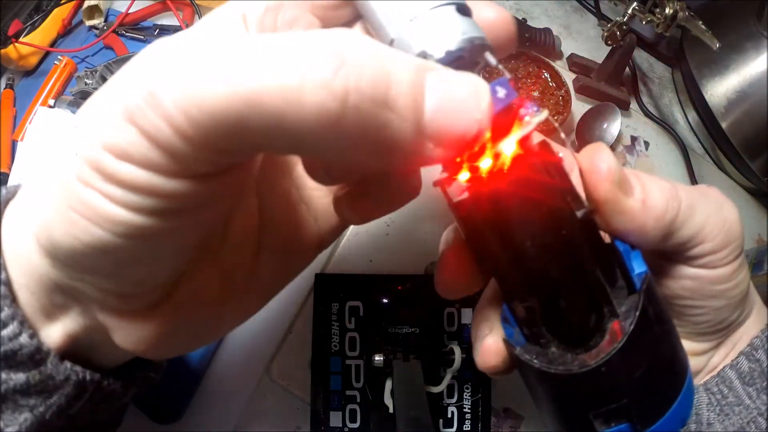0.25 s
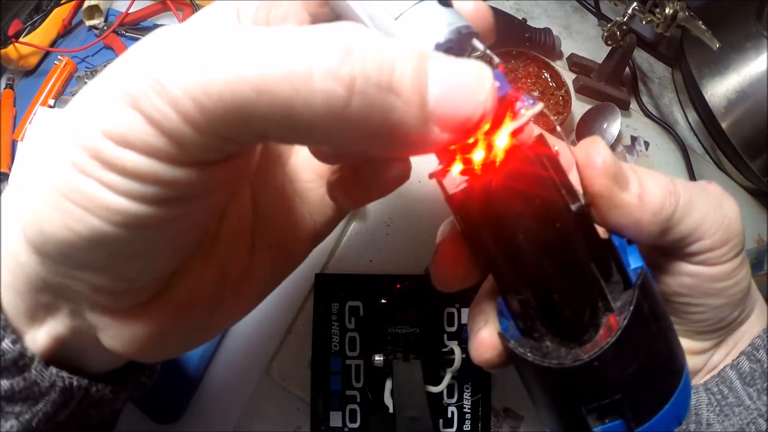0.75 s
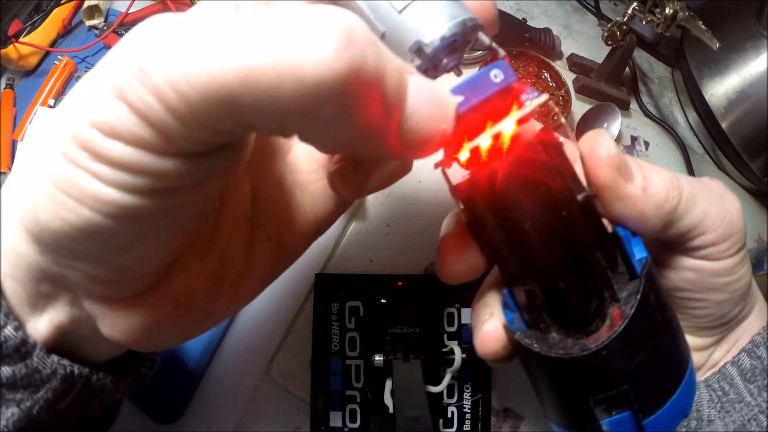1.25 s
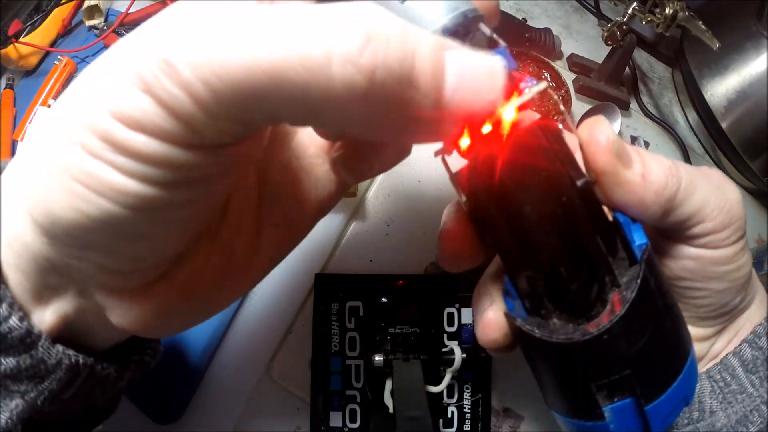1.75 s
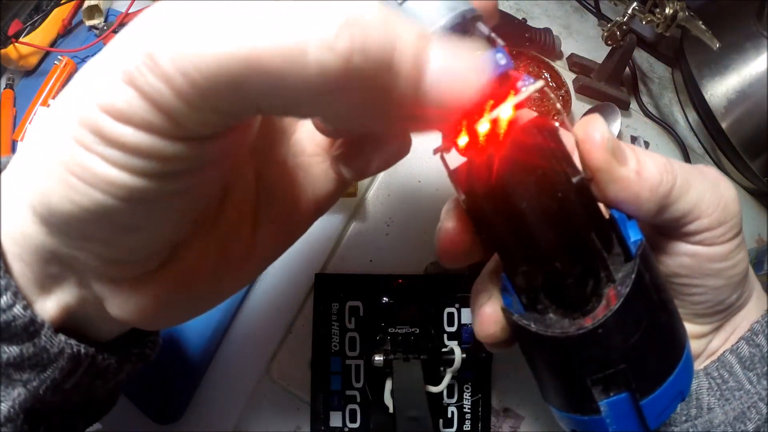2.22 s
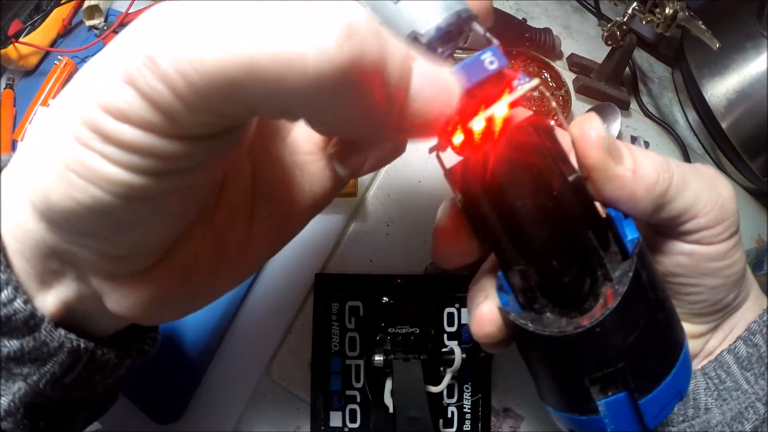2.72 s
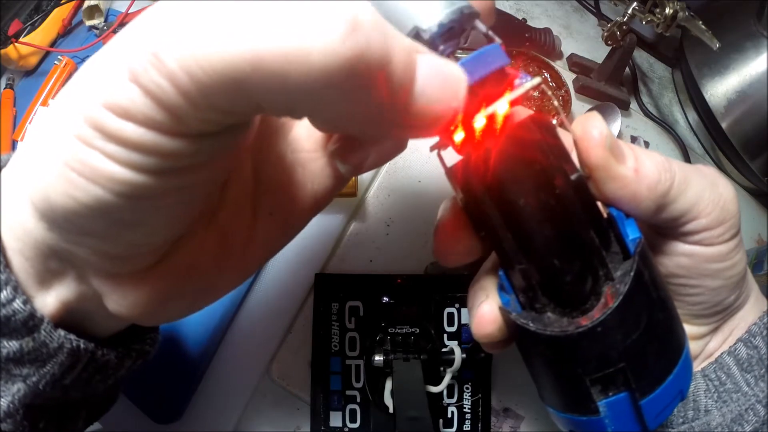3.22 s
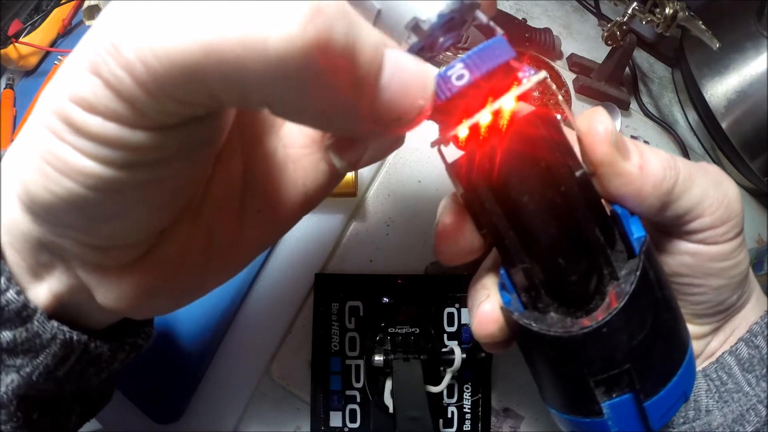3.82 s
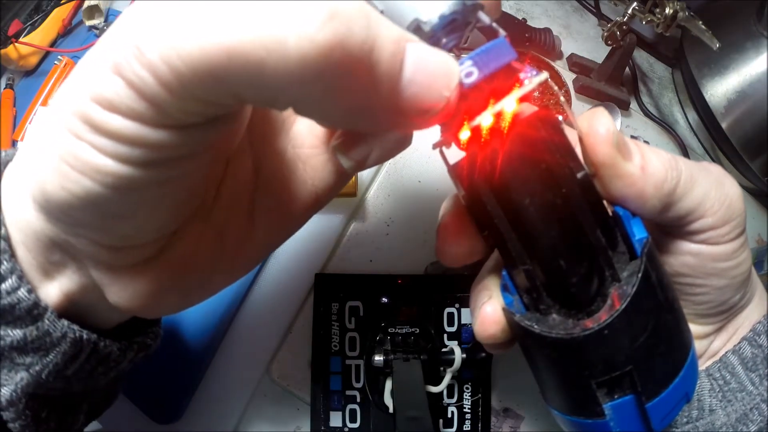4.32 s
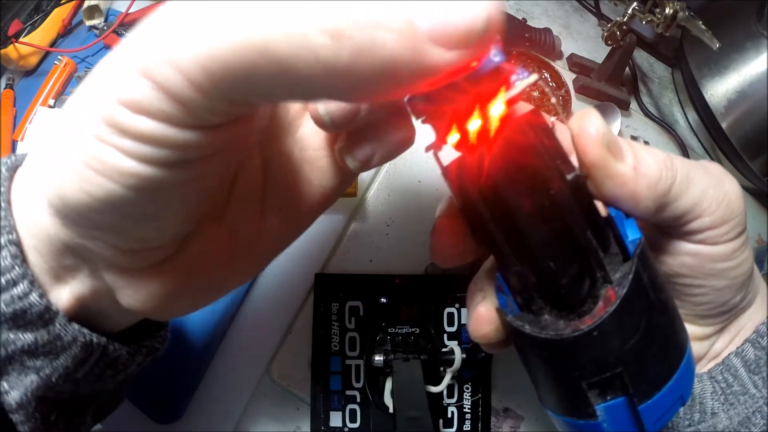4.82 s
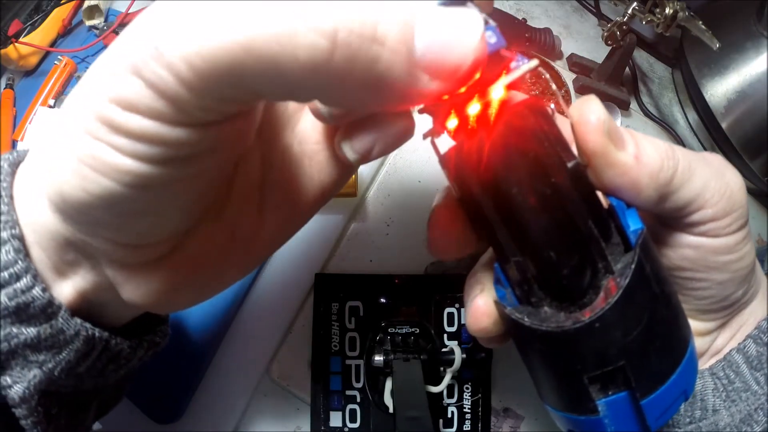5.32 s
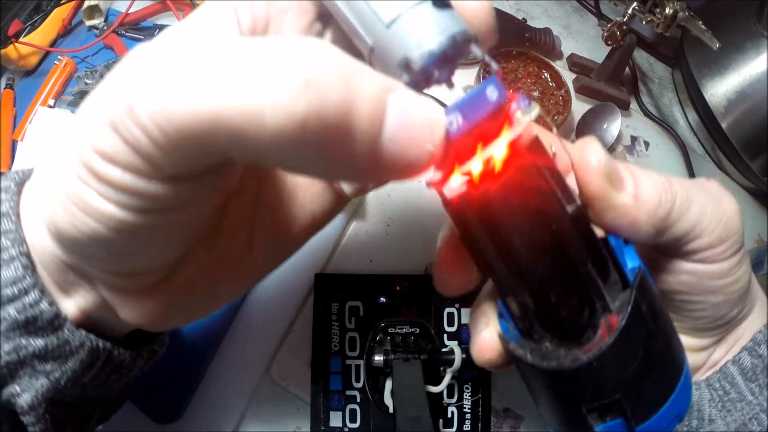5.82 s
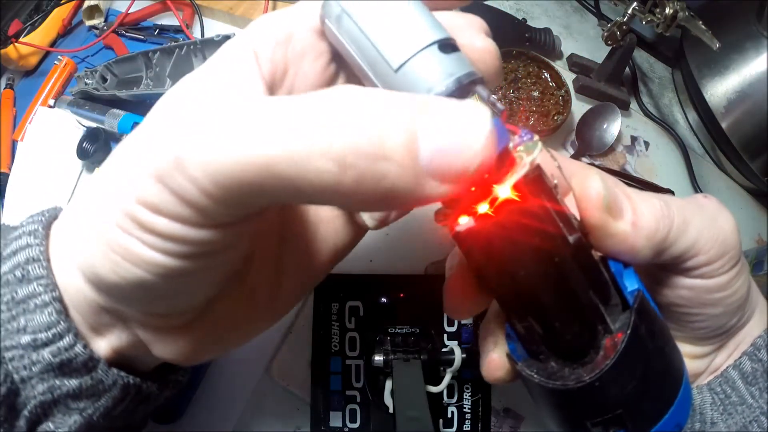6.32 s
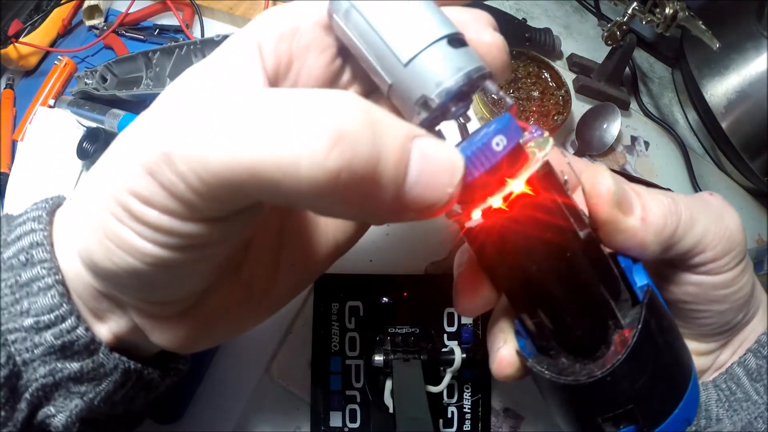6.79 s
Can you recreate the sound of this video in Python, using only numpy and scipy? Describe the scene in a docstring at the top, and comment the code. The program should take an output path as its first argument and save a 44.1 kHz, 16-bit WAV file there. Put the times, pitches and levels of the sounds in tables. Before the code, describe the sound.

Indoors at a workbench, closely miked: a little electric motor spinning freely with no load. Its nasal whine rises as the speed is turned up, passing through rattling, buzzy patches where it shakes, and becomes bright, piercing and hissy. After a steady high stretch, the pitch sags gently in steps, remaining fast and shrill to the end. Dry, short reflections, with only a very faint low hum behind.

```python
"""Workshop: a small cordless rotary tool runs free in the hand, close to the microphone.
A thumb turns the speed dial up in steps, holds it, then eases it back; one shaft speed drives all tool sounds.
The armature whines in sine tones, loudest on the ninth shaft order. Brush contacts repeat every turn as
chatter and a higher buzz. Dry bearings rasp and brushes hiss as filtered noise; the room rumbles and hums."""
import sys
import numpy as np
from scipy import signal
from scipy.fft import rfft, irfft
from scipy.io import wavfile

SR = 44100
rng = np.random.default_rng(int(sys.argv[2]) if len(sys.argv) > 2 else 0)


def file_out(sig):
    """Save sig as 16-bit WAV at sys.argv[1]."""
    # one column per channel
    cols = np.atleast_2d(sig).T
    # limit, then scale
    lim = np.clip(cols, -1, 1)
    pcm = np.round(lim * 32767).astype(np.int16)
    wavfile.write(sys.argv[1], SR, pcm)


N = 310990
TIME_S = np.arange(N) / SR
BINS_HZ = np.fft.rfftfreq(N, 1 / SR)

START_SPEED_HZ, FULL_SPEED_HZ = 134.3, 440  # shaft turns per second
JITTER, DRIFT = 0.00032, 0.000397  # quick and slow shaft unsteadiness, rms share of speed
WHINE_ORDER = 9
WHINE_FLUTTER, SIDE_FLUTTER = 0.1, 0.16  # quick, rms share of amplitude
WHINE_SWAY_DB, SIDE_SWAY_DB = 0.18, 1.5  # rms; the tool shifts in the hand
RATTLE_SWAY_DB = 1.15  # rms; the chatter comes and goes
ROOM_DB = -46
EDGE_HZ = 15300

# Turns of the dial: start_s, goal_speed_hz, lag_s
DIAL = [(-0.162, 178.544, 0.187), (0.71, 210.819, 0.652), (1.083, 275.177, 0.253), (1.264, 321.1, 0.068),
        (1.465, 347.437, 0.155), (2.036, 370.978, 0.072), (2.652, 402.186, 0.052), (3.26, 443.586, 0.04),
        (4.663, 398.953, 0.121), (5.271, 376.764, 0.138), (6.243, 356.664, 0.109)]
# Armature tones before carry and swell: shaft_order, full_speed_db, growth_db_per_octave
TONES = [(2, -46.9, 60), (3, -39, 12.9), (6, -33.4, 13.4), (9, -19.7, 8.7), (12, -43.7, 6), (13, -45, 8.5),
         (15, -44.6, 7), (18, -43.5, 8), (24, -52, -2)]
# How tones carry from the body: pitch_hz, gain_db
CARRY = [(280.0, -3.2), (550.0, -2.8), (750.0, 1.8), (1100.0, 9.8), (1600.0, -5.6), (2500.0, -1.0),
         (4000.0, -0.1), (5000.0, -2.5), (7000.0, 2.7), (10600.0, 0.9)]
# Resonances and dead spots the tones cross: centre_hz, width_hz, lift_db
CARRY_PEAKS = [(776.0, 138.0, 15.0), (839.0, 49.0, -20.0), (1242.0, 179.0, -7.0), (1511.0, 94.0, -5.0),
               (2449.0, 148.0, -7.0), (2679.0, 58.0, -20.0), (2838.0, 300.0, 9.0), (2928.0, 53.0, -12.0),
               (3111.0, 20.0, -16.0), (3210.0, 66.0, 6.0), (3282.0, 53.0, -22.0), (3313.0, 55.0, 10.0),
               (3408.0, 20.0, 4.0), (3460.0, 20.0, -6.0), (3628.0, 240.0, -11.0), (3846.0, 94.0, 4.0),
               (4832.0, 600.0, 10.0), (5530.0, 41.0, -16.0)]
# Slow swell of three tones as the tool shifts in the hand: time_s, third_db, ninth_db, twelfth_db
TONE_SWELL = [(0.0, -3.7, -6.0, 3.8), (1.0, 3.5, 3.4, -3.0), (1.9, 1.5, -3.5, 0.3), (2.35, 1.1, -5.3, -9.6),
              (2.8, 1.7, -1.5, 6.8), (3.3, 0.8, 2.3, 1.5), (3.9, 7.8, 1.4, 6.8), (4.4, 1.6, 3.8, -9.3),
              (4.8, -3.1, 0.9, 1.9), (5.2, -4.2, 6.6, -3.6), (5.6, -1.8, 1.5, 4.9), (6.3, -3.0, -2.8, 1.1),
              (7.05, -2.0, -0.7, -1.7)]
# Shaft orders of the swelling tones, in column order: shaft_order
SWELL_ORDERS = (3, 9, 12)
# Ticking orders that stand out or hang back: shaft_order, lift_db
ORDER_LIFTS = [(1, -1), (4, 3.5), (5, 2.5), (7, 4), (8, -1.5), (10, -4), (11, -2), (14, -3), (16, -4),
               (17, -2.5), (19, 0), (20, -7), (21, 1.5), (22, 2), (23, -5), (25, -2), (27, 0.5), (28, -1.5),
               (29, -14), (30, -4), (31, -2), (33, -3), (36, 1), (42, 2.5), (44, 3.5)]
# Housing resonances, applied in part to the ticks: centre_hz, width_hz, lift_db
HOUSING = [(2620, 113, 7), (2764, 78, 10.5), (2820, 50, 8), (3003, 57, 9), (3230, 130, 1), (3710, 57, -13),
           (4180, 34, -14.5), (4450, 62, 2.5), (4750, 25, 5), (6550, 180, 3.5), (7900, 160, 4.5),
           (10970, 250, 13.5)]
# Critical speeds where the rotor shakes: speed_hz, half_width_hz
CRITICAL = [(181, 15), (217, 24.4), (252, 16.8), (298, 27)]
# Contact level laws: full_speed_db, growth_db_per_octave, then lift_db at each critical speed
CHATTER_LAW = (-40.8, 8, 8, 15.5, 16.5, 3)
BUZZ_LAW = (-46.5, 7.5, -1, 3.5, 3, 0)
RASP_LAW = (-23.5, 12.5, -3.5, 0, -1, 0)
HISS_LAW = (-25, 18.5, 8, 9.5, 10.5, 6.5)
# Tick spectra, low chatter and commutator buzz: frequency_hz, relative_db
CHATTER = [(250, -26), (350, -17), (385, -10), (470, -18), (700, -9.5), (900, -15), (1300, -11.5),
           (1900, -9.5), (2500, -7), (3400, -11), (3950, -3.5), (4400, -2), (4850, 1), (5200, -4.5),
           (5600, -12), (7000, -55)]
BUZZ = [(4300, -77), (5600, -9), (6900, 1.5), (7900, -1.5), (8900, -11), (10500, -11), (11200, -24),
        (11900, -27.5), (12700, -27), (14200, -36), (15200, -39)]
# Slow swell of the commutator buzz: time_s, level_db
BUZZ_SWELL = [(0, 0), (1.5, 2.5), (2.2, -4), (3.1, 4), (4.1, -14), (4.8, 5), (5.5, 4), (6.3, 1.5),
              (7.05, -0.5)]
# Bearing rasp spectra, slow and fast running: frequency_hz, relative_db
RASP_SLOW = [(150, -36), (500, -8), (950, -4), (1400, 3), (1900, 2), (2450, -8.5), (2900, -12), (3600, -5),
             (6000, -27)]
RASP_FAST = [(150, -34), (330, -20), (600, -14), (950, -10), (1250, -0.5), (1600, 0), (1950, 4.5),
             (2400, -4), (3200, -0.5), (3600, -3), (4100, -14), (6000, -36)]
# Brush hiss spectra, slow and fast running: frequency_hz, relative_db
HISS_SLOW = [(1200, -26), (3300, -12), (3900, -3), (4700, -4), (5200, -4), (5600, -13), (7900, -19),
             (8800, -34), (11200, -50), (11850, -13), (12600, -34), (15200, -44)]
HISS_FAST = [(1200, -35), (3300, -15), (3850, 3), (4400, 3), (4900, -3.5), (5400, -7.5), (6300, -11.5),
             (7900, -15), (9000, -20.5), (10200, -14.5), (11200, -31.5), (12000, -20), (12600, -32),
             (15200, -45)]
# Room rumble spectrum: frequency_hz, relative_db
ROOM = [(15, -5), (45, -7), (57, -5.5), (70, -3), (86, 2), (96, 1.5), (110, -5.5), (128, -3), (147, -10.5),
        (185, -4), (250, -18), (500, -19.5), (2000, -42), (15000, -87)]
# Mains hum: frequency_hz, rms_db
HUM = [(100, -48.5), (200, -55.5)]


def gain_of(db):
    """Decibels to amplitude."""
    return np.exp(np.asarray(db) * np.log(10) / 20)


def evened(x):
    """Scales to rms 1."""
    return x / np.sqrt(np.mean(x ** 2) + 1e-20)


def spectrum_db(points, hz):
    """Joins spectrum points by straight lines on a log-frequency axis."""
    point_hz, point_db = np.transpose(points)
    return np.interp(np.log(hz + 1), np.log(point_hz + 1), point_db)


def resonances_db(table, hz):
    """Sums the bell-shaped gains of a set of resonances."""
    return sum(db / (1 + (2 * (hz - centre) / width) ** 2) for centre, width, db in table)


def housing_db():
    """Gain of the housing resonances at every FFT bin."""
    return resonances_db(HOUSING, BINS_HZ)


def slow_db(points):
    """Level curve joined by straight lines, one value a sample."""
    return np.interp(TIME_S, *np.transpose(points))


def coloured(x, db):
    """Filters x by a gain at each FFT bin, then scales to rms 1."""
    return evened(irfft(rfft(x) * gain_of(db), N))


def wander(rate_hz, size=8192):
    """Random drift of rms 1, up to about rate_hz."""
    coarse_s = np.linspace(0, TIME_S[-1], size)
    coarse_hz = np.fft.rfftfreq(size, coarse_s[1])
    lowpass = 1 / (1 + (coarse_hz / rate_hz) ** 4)
    slow = irfft(rfft(rng.standard_normal(size)) * lowpass, size)
    return np.interp(TIME_S, coarse_s, evened(slow))


def shaft_speed():
    """After each dial turn the rotor eases towards its new speed with a critically damped step."""
    speed_hz = np.full(N, START_SPEED_HZ)
    before_hz = START_SPEED_HZ
    for start_s, goal_hz, lag_s in DIAL:
        lags = np.maximum(TIME_S - start_s, 0) / lag_s
        speed_hz = speed_hz + (goal_hz - before_hz) * (1 - (1 + lags) * np.exp(-lags))
        before_hz = goal_hz
    return speed_hz


def contact_db(speed_hz, law):
    """A contact's level follows speed, with a lift or dip where the rotor shakes."""
    full_db, growth_db, *lifts_db = law
    shake_db = sum(db * np.exp(-((speed_hz - centre) / half_width) ** 2)
                   for (centre, half_width), db in zip(CRITICAL, lifts_db))
    return full_db + growth_db * np.log2(speed_hz / FULL_SPEED_HZ) + shake_db


def whine(turns, speed_hz):
    """Armature tones follow speed, swell and fade across resonances, and flutter a little."""
    swell_db = {order: slow_db([(s, levels[i]) for s, *levels in TONE_SWELL])
                for i, order in enumerate(SWELL_ORDERS)}
    carry_db = spectrum_db(CARRY, BINS_HZ) + resonances_db(CARRY_PEAKS, BINS_HZ)
    octaves = np.log2(speed_hz / FULL_SPEED_HZ)
    out = np.zeros(N)
    for order, full_db, growth_db in TONES:
        if order == WHINE_ORDER:
            flutter, sway_db = WHINE_FLUTTER, WHINE_SWAY_DB
        else:
            flutter, sway_db = SIDE_FLUTTER, SIDE_SWAY_DB
        tone_db = full_db + growth_db * octaves + np.interp(order * speed_hz, BINS_HZ, carry_db)
        level = gain_of(tone_db + swell_db.get(order, 0) + sway_db * wander(rate_hz=5.8))
        tone = np.sin(2 * np.pi * (order * turns + rng.random()))
        out += level * (1 + flutter * wander(rate_hz=29)) * tone
    return np.sqrt(2) * out


def ticks(turns, speed_hz, without, slip_turns=0.00078, size=8192, count=105):
    """One uneven row of contacts repeats every turn: shaft orders near rms 1, less the given ones."""
    orders = np.arange(count)
    lift_db = sum(db * (orders == order) for order, db in ORDER_LIFTS)
    phases = np.exp(2j * np.pi * rng.random(count))
    lines = gain_of(lift_db) * phases * ~np.isin(orders, [0, *without])
    # bouncing brushes land early or late, blurring the top orders
    contact = turns + slip_turns * wander(rate_hz=62)
    place = np.floor(contact * size).astype(int) % size
    out = np.zeros(N)
    for group in np.array_split(orders, count // 7):
        one_turn = irfft(lines * np.isin(orders, group), size) * size / np.sqrt(2)
        audible = np.clip((SR / 2 - group[-1] * speed_hz) / 2000, 0, 1)  # fades out below Nyquist
        out += audible * one_turn[place]
    return out


def bench(x, wet_db, t60_s):
    """Early echoes from hands, bench and walls: gliding lines swell and fade as they cross them."""
    echo_s = TIME_S[:SR // 4]
    hits = rng.random(len(echo_s)) < 2000 / SR  # about 2000 echoes per second
    taps = rng.standard_normal(len(echo_s)) * hits * gain_of(-60 * echo_s / t60_s)
    echoes = signal.fftconvolve(x, taps / np.linalg.norm(taps))[:N]
    return x + gain_of(wet_db) * echoes


def ringing_ticks(stack, spectrum, level_db, coupling=0.26):
    """Ticks ring through the housing, at a share of its dB gain, and the space around it."""
    colour_db = spectrum_db(spectrum, BINS_HZ) + coupling * housing_db()
    rung = irfft(rfft(stack) * gain_of(colour_db), N)
    return gain_of(level_db) * bench(rung, wet_db=-4, t60_s=0.06)


def rub(turns, fast, spectra, level_db, throb, flicker_db):
    """Friction noise swells once a turn, rings in the housing and changes colour with speed."""
    once_a_turn = 1 + throb * np.cos(2 * np.pi * turns)
    flicker = gain_of(flicker_db * wander(rate_hz=21))
    force = rng.standard_normal(N) * once_a_turn * flicker
    slow_sound, fast_sound = (coloured(force, spectrum_db(s, BINS_HZ) + housing_db()) for s in spectra)
    return gain_of(level_db) * ((1 - fast) * slow_sound + fast * fast_sound)


def room():
    """Low rumble of filtered noise that swells a little, plus steady mains hum sines."""
    hum = sum(gain_of(db) * np.sqrt(2) * np.sin(2 * np.pi * (hz * TIME_S + rng.random())) for hz, db in HUM)
    swell_db = 0.88 * wander(rate_hz=2.0)
    rumble = coloured(rng.standard_normal(N), spectrum_db(ROOM, BINS_HZ))
    return hum + gain_of(ROOM_DB + swell_db) * rumble


def scene():
    """One shaft drives every tool sound, its speed setting their levels; the room is added."""
    speed_hz = shaft_speed()
    unsteady = 1 + JITTER * wander(rate_hz=37.0) + DRIFT * wander(rate_hz=4.21)
    turns = np.cumsum(speed_hz * unsteady) / SR
    armature = whine(turns, speed_hz)

    stack = ticks(turns, speed_hz, without=[order for order, *_ in TONES])
    chatter_db = contact_db(speed_hz, CHATTER_LAW) + RATTLE_SWAY_DB * wander(rate_hz=9.7)
    chatter = ringing_ticks(stack, CHATTER, chatter_db)
    buzz_db = contact_db(speed_hz, BUZZ_LAW) + slow_db(BUZZ_SWELL)
    commutator = ringing_ticks(stack, BUZZ, buzz_db)

    fast = np.clip((speed_hz - 200) / 160, 0, 1)  # 0 up to 200 turns/s, 1 from 360
    bearings = rub(turns, fast, (RASP_SLOW, RASP_FAST), contact_db(speed_hz, RASP_LAW),
                   throb=0.22, flicker_db=0.5)
    brushes = rub(turns, fast, (HISS_SLOW, HISS_FAST), contact_db(speed_hz, HISS_LAW),
                  throb=0.3, flicker_db=1.15)
    return (armature + chatter + commutator + bearings + brushes + room())[None]


def record(dry):
    """The recorder's band limit: a linear-phase low-pass."""
    lowpass = signal.firwin(511, EDGE_HZ, window=("kaiser", 9), fs=SR)
    return signal.oaconvolve(dry, lowpass[None], "same")


dry = scene()
out = record(dry)
file_out(out)
```